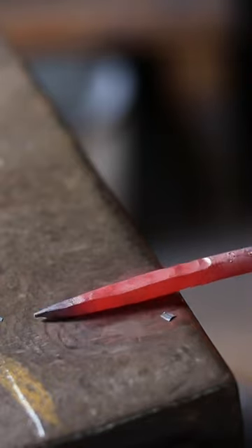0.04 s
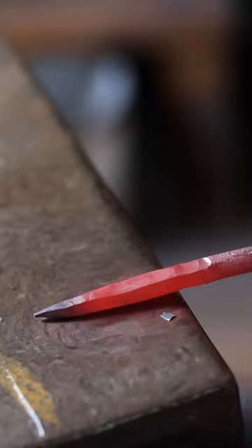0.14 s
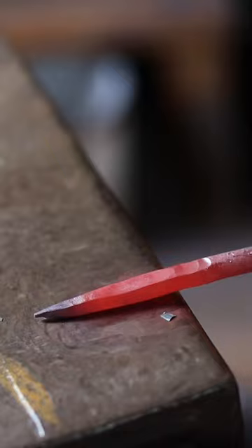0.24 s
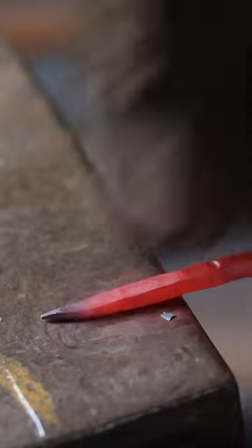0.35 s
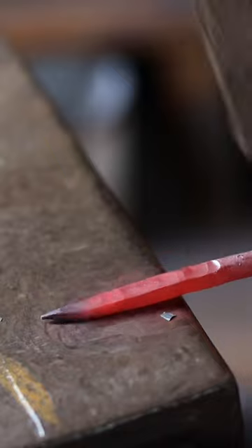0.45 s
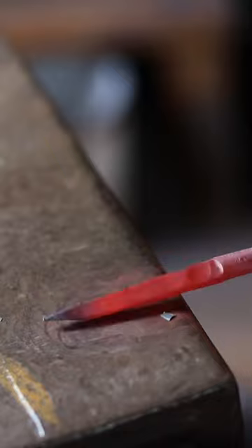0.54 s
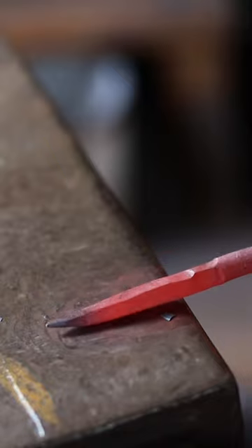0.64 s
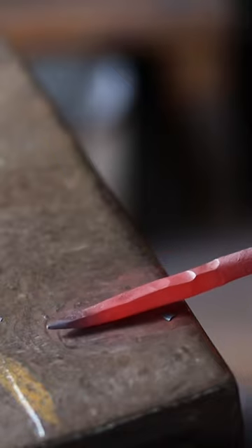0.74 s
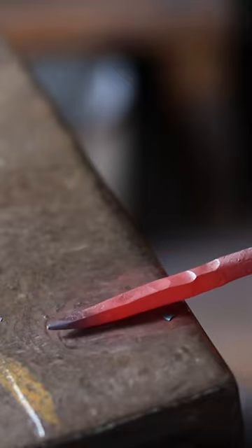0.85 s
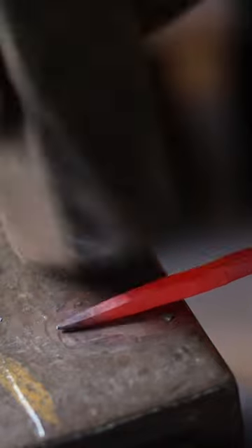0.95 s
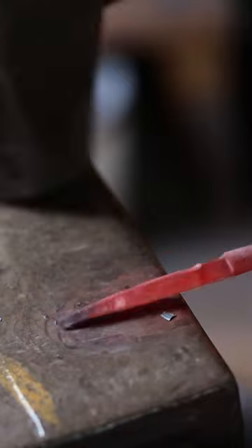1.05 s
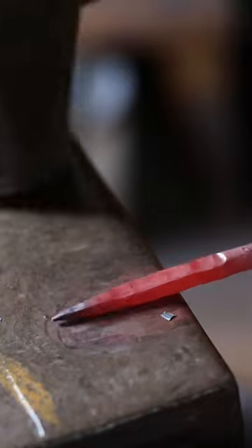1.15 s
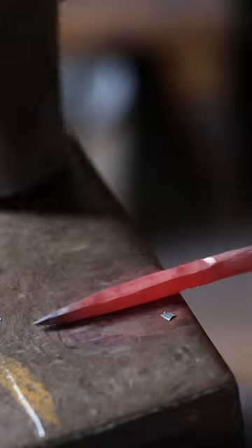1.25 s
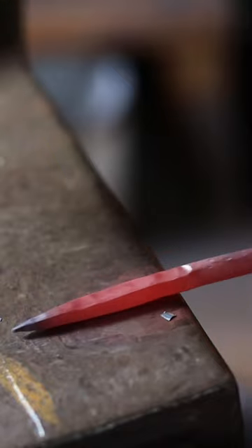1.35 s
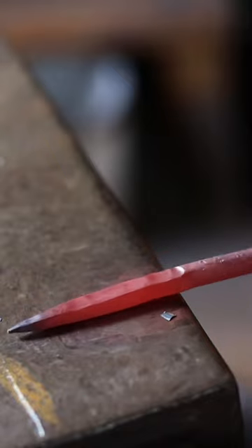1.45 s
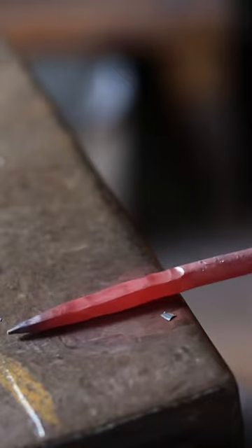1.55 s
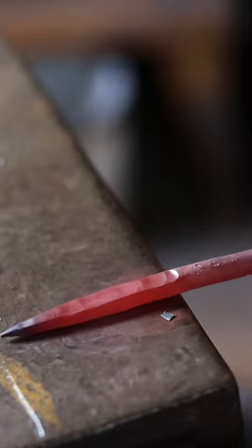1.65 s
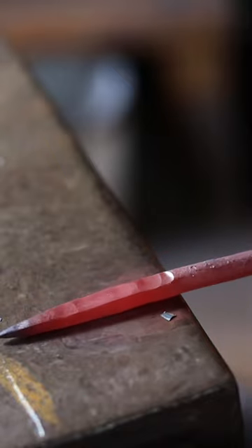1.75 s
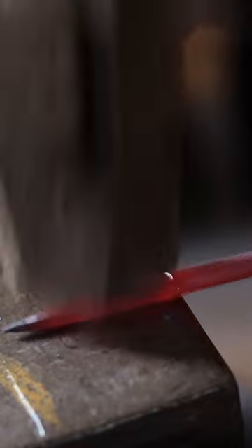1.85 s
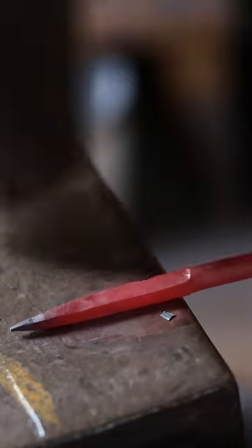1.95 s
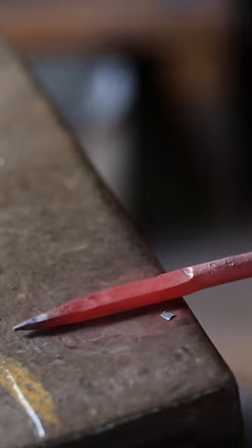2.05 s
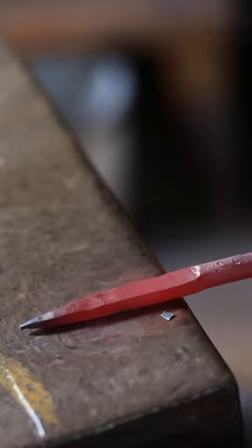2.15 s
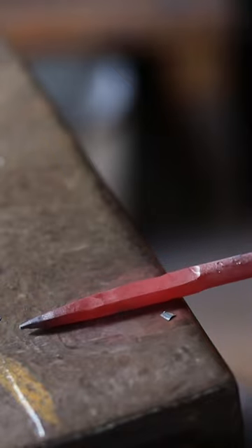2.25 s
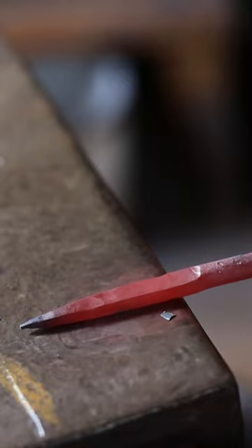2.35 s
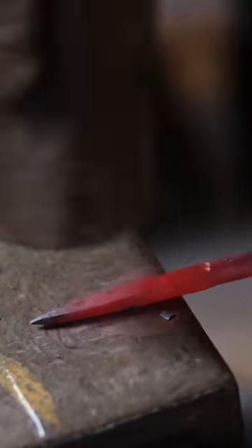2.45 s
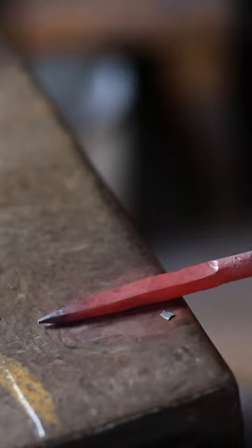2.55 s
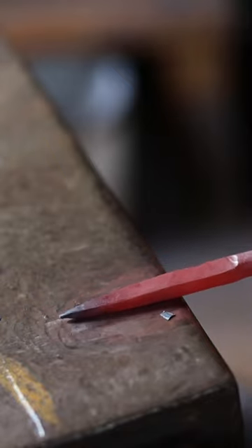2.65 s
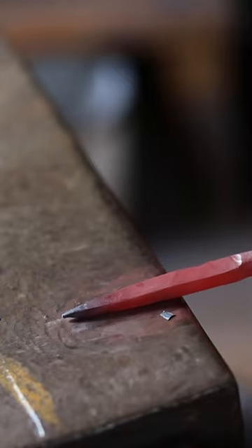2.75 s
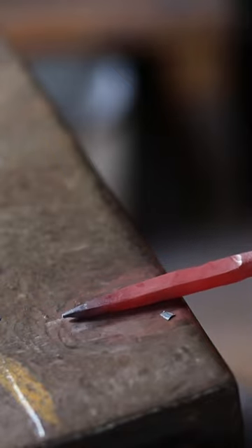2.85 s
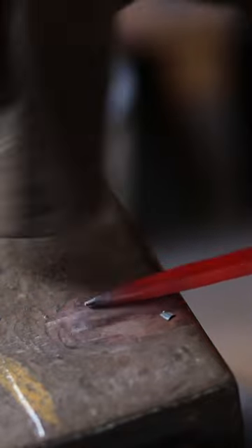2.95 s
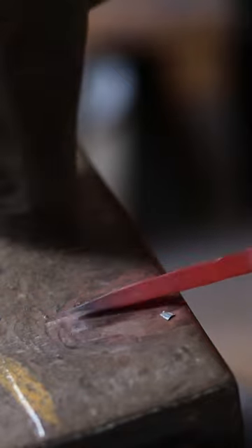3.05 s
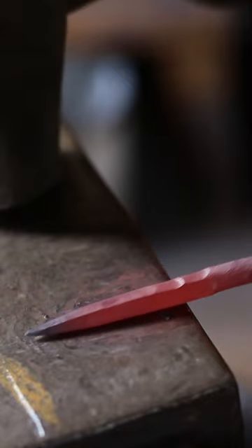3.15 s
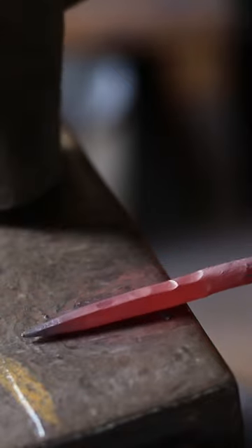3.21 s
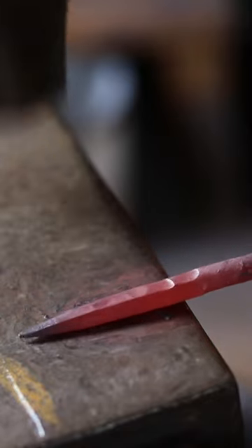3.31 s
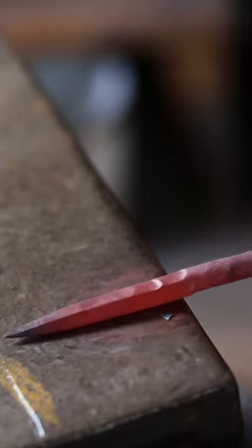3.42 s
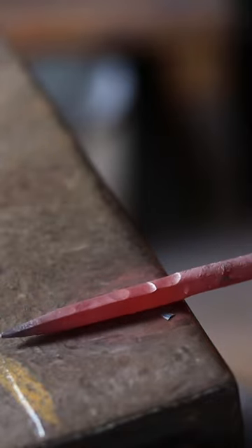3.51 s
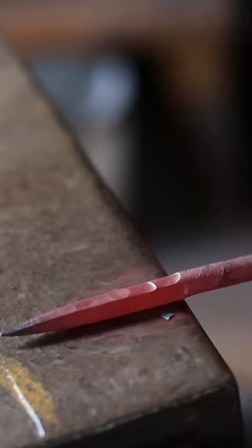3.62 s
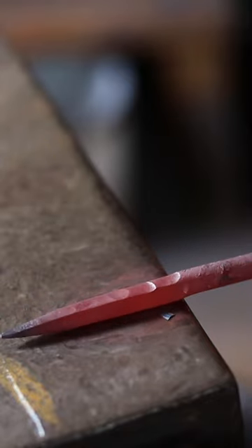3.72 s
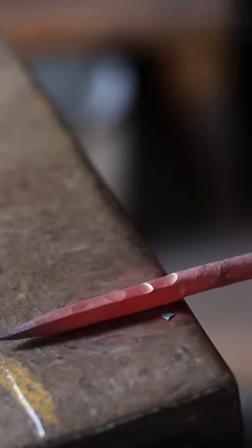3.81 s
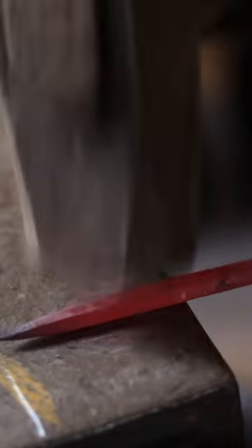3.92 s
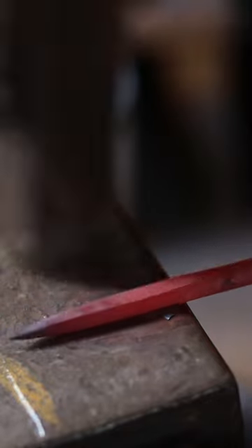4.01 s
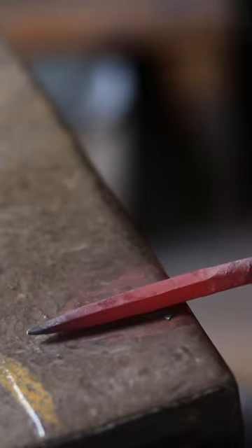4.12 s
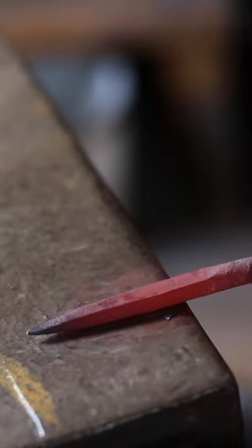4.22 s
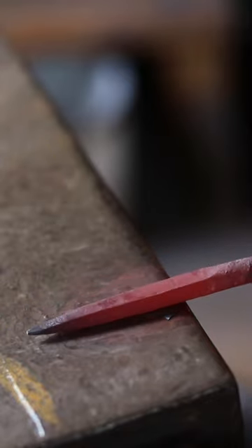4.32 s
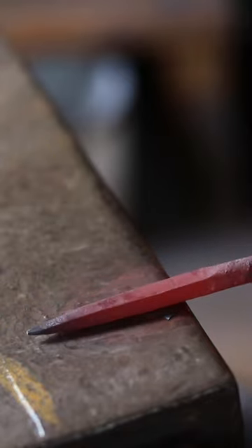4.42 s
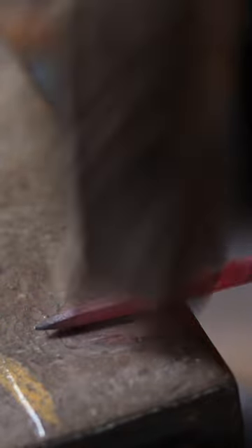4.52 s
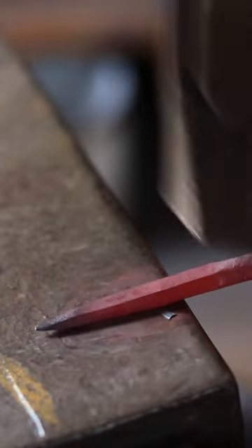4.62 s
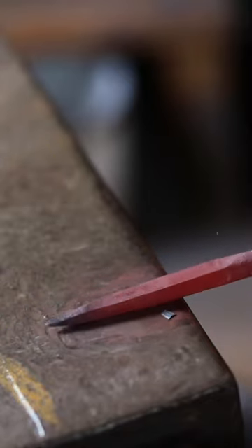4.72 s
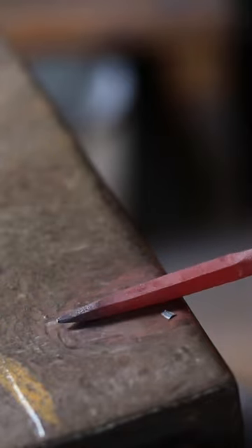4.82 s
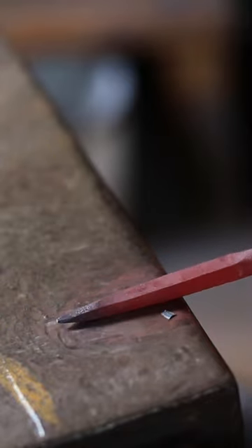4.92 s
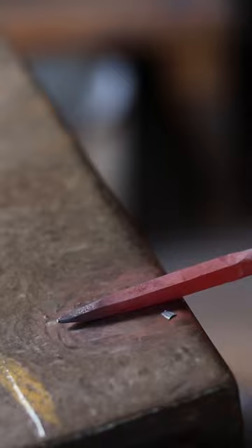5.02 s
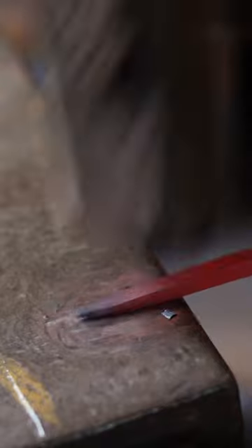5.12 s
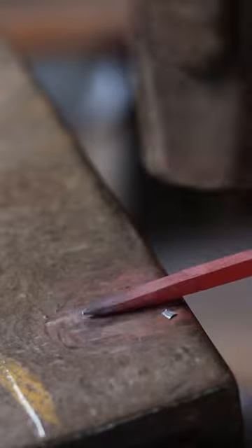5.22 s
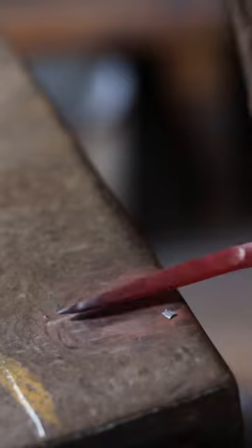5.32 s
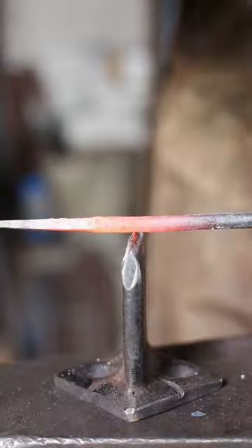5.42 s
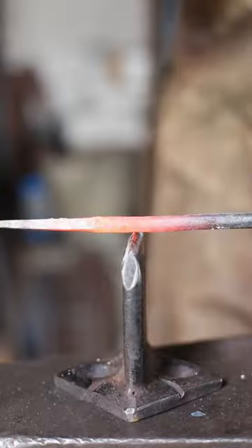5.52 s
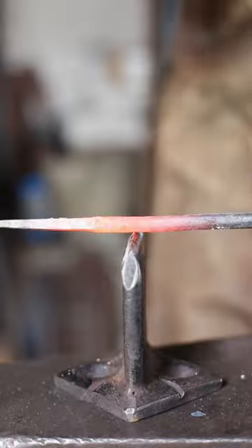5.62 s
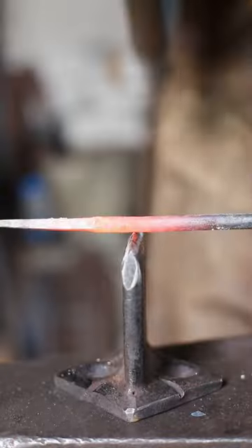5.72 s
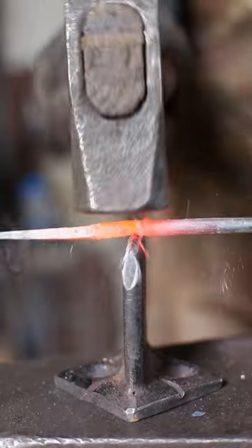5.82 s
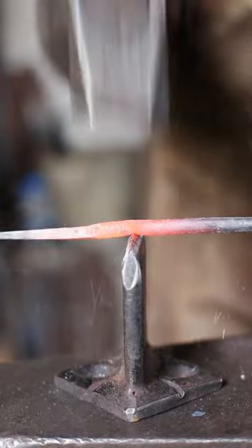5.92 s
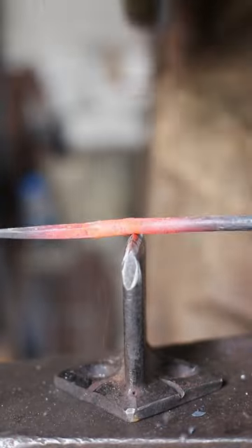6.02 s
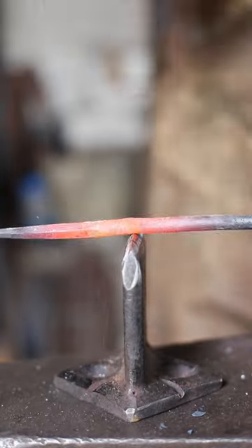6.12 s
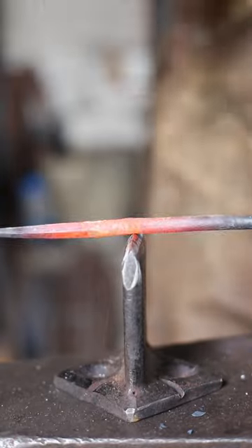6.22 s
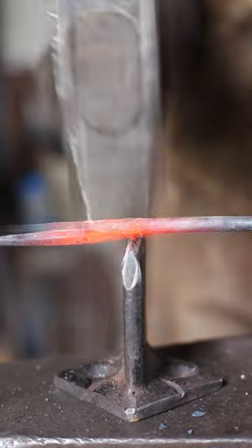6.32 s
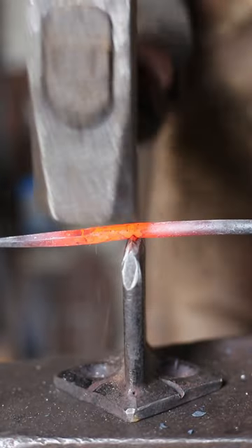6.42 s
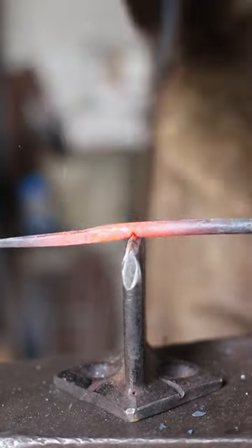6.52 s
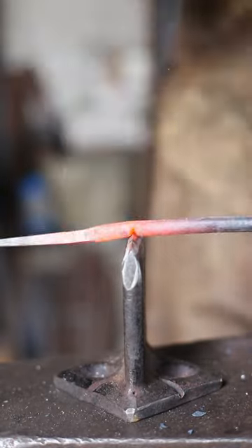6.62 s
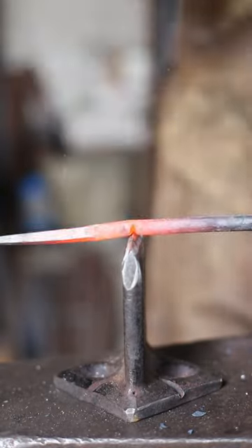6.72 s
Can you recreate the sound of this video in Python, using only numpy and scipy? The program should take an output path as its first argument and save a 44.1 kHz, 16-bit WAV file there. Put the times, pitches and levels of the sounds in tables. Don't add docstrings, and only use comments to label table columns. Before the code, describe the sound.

Steady low burner roar in a small workshop, microphone right by the anvil and overloading. Eight heavy, somewhat uneven hammer blows give a hard smack, a metallic clang and high hammer ring, dying in a fraction of a second. Two of them end in quick rattling bounces that choke the ring. Iron ticks and faint scraping follow, then two lower, woodier thuds on an upright cutting tool with the rod ringing along.

```python
import sys
import numpy as np
from scipy import signal
from scipy.fft import rfft, irfft, next_fast_len
from scipy.io import wavfile
from scipy.ndimage import uniform_filter1d

SR = 44100
rng = np.random.default_rng(int(sys.argv[2]) if len(sys.argv) > 2 else 0)


def level_to_linear(level):
    exponent = np.asarray(level, float) / 20
    return 10 ** exponent


def wrap_up_sound(samples):
    columns = np.atleast_2d(samples).T
    tamed = np.clip(columns, -1, 1)
    steps = np.round(tamed * 32767).astype(np.int16)
    wavfile.write(sys.argv[1], SR, steps)


N = 298116

# frequency in Hz, density in dB per Hz.
BURNER = [(15, -42), (25, 2), (53, -11.5), (80, -49.5), (99, -9), (270, -4), (335, -8), (373, -2.5),
          (427, -21), (503, -8.5), (641, -11), (1650, -16), (2480, -25), (2990, -24.5), (16000, -50)]
BURNER_DB = -34
# frequency in Hz, width in Hz, level in dB, start in seconds.
FLUE = [(366.5, 16, -42, -3), (188, 22, -42.5, -3), (583.4, 4.7, -42, 5.77), (473, 15, -46, 5.5)]
HISS_DB = -56.5

# start in seconds, force in dB, then anvil low mode, anvil twin mode
# and hammer ring, all in dB.
BLOWS = [(.289, 11.5, -2.5, -2, 5), (.907, 13.5, -2, 1, 8), (1.816, 13, 4.5, 4.5, 7.5),
         (2.38, 12.5, 3.5, 7.5, 11), (2.879, 12, 4, 3, 8.5), (3.891, 14, 8.5, 6.5, 5.5),
         (4.482, 13, 3, 1, 9.5), (5.088, 13, 4, -0.5, 8), (5.765, 3, -4, -8, -8),
         (6.322, 3, -8.5, -6.5, -16)]
# start in seconds, force in dB.
BOUNCES = [(1.013, 1.5), (1.039, 0.5), (1.057, -5), (1.078, -7.5), (1.086, -11), (2.985, 4.5), (3.06, -1),
           (3.111, 1), (3.142, -10.5), (3.162, -16), (3.181, -18.5)]
RESTS_S = [1.086, 3.181]
# loss at the first bounce in dB, loss at each further bounce in dB.
BOUNCE_LOSS = [(-10.5, -2.5), (-8, -4.5), (-4, -4), (-9, -10)]
REST_LOSS_DB = [0.1, 7, -28, -2]
THUD_DB, CUTTER_THUD_DB = -8, -2
CUTTER_FROM_S, BOUNCE_GAP_S = 5.5, .2

OFF_CENTRE_HZ = {"face": 14290, "cheek": 13095, "neck": 12600, "eye": 10340, "peen": 7285, "wedge": 4265}
OFF_CENTRE_T60 = {"face": .26, "cheek": .16, "neck": .094, "eye": .14, "peen": .17, "wedge": .19}
# start in seconds, part of the head, level in dB.
GLANCES = [(.288, "face", -2), (0.906, "eye", -10), (1.014, "cheek", -8), (1.057, "peen", -2),
           (1.078, "face", -22), (2.986, "peen", -7), (2.984, "wedge", -5), (2.986, "neck", -7.5),
           (3.162, "face", -40), (5.088, "eye", 1), (5.089, "cheek", -4), (5.37, "face", -55),
           (5.41, "peen", -47)]
PRESSED_RING = .4
ROD_HZ = [
    [7364, 11000, 3270],
    [996, 7935, 3430, 11500, 6905, 10750, 5750],
]
# level in dB re force, t60 in seconds.
ROD = [
    [(-0.5, 0.28), (-2, 0.14), (-11, 0.23)],
    [(-3, 0.25), (0, 0.13), (3, 0.071), (-5.5, .078), (-9.5, 0.24), (-22.5, .21), (-3, 0.12)],
]
ROD_SWELL_CYCLES = 8.6

ANVIL_LOW_HZ = [2405, 2405]
# level in dB re the low column, t60 in seconds.
ANVIL_LOW = [(-5, 0.56), (2.5, 0.26)]
ANVIL_TWIN_HZ = [2541, 1830, 5740]
# level in dB re the twin column, t60 in seconds.
ANVIL_TWIN = [(5, 0.26), (-22, 0.19), (-18.5, 0.28)]
PARTNER_HZ = [-8, 10]
# level in dB re the column, t60 in seconds, first swell in seconds.
PARTNER = [(-6, .4, .075), (-9, 0.45, 0.024)]
ANVIL_HORN_HZ = [2060, 4242, 5197, 6046, 6645, 52, 9060, 11250, 3230]
# level in dB re the blow's tail, t60 in seconds.
ANVIL_HORN = [(-20.5, 0.27), (-21.5, 0.34), (-28.5, .3), (-13.5, 0.22), (-25.5, 0.4), (-29, 0.76),
              (-26, .17), (-26.5, .16), (-28, 0.11)]
SEAT_DB = -2.5
HAMMER_HZ = [7612, 7222, 10340, 12600, 13120, 13585]
# level in dB re the hammer column, t60 in seconds.
HAMMER = [(2.5, 0.23), (-3, 0.18), (-16.5, 0.16), (-15, 0.047), (-25, .15), (-33, 0.28)]
LOOSE_UNTIL_S, LOOSE_PITCH, LOOSE_RING = 1.5, .9965, 1.47
BEAT = .3
CUTTER_HZ = [212, 247, 280, 441, 640, 583, 783, 4900, 6050, 7364, 8608, 700, 856]
# delay in seconds, level in dB re thud, t60 in seconds, rise in ms.
CUTTER = [(0.00074, -1.5, 0.12, 3), (.021, 3, 0.19, 40), (.021, -4.5, 0.29, 23), (0.0012, -12, 0.39, 3.9),
          (0.00073, -9, 0.18, 2.3), (.05, -9.5, 0.17, 14), (0.00678, -16.5, 0.43, 12),
          (0.0094, -17, 0.19, 1.5), (0.0064, -8.5, 0.19, 5.6), (0.0085, -7, 0.11, 3.2),
          (0.00029, -4.5, 0.12, 1.2), (.01, -13.5, 0.28, 8), (.01, -15.5, 0.27, 8)]

# frequency in Hz, density in dB per Hz, t60 in seconds, rise in ms.
TAIL = [(30.1, -27, 0.64, 37), (51, -15, 0.3, 19), (102, -16.5, 0.79, 13), (278, 0, 0.48, 2.2),
        (504, -3, 0.49, 2.2), (1296, -19.5, 0.45, 15), (2050, -15.5, 0.44, 0.8), (4060, -19.5, .3, 0.61),
        (7900, -22, 0.26, 0.46), (14600, -26, 0.16, 2.6)]
THUD_HZ = 736
CRACK_DB, CRACK_T60 = 12.5, 0.009
BOUNCE_DB, BOUNCE_T60 = 5, 0.35
BOUNCE_DULL_DB = -10
SOFT_DULL_DB = -0.32
CLICK_DB, CLICK_T60 = 9, 0.0073
GRAIN_DB, GRAIN_HZ = 2.5, 40

# start in seconds, level in dB, frequency in Hz, t60 in seconds.
TICKS = [(1.582, -17, 1270, 0.018), (1.581, -9.5, 2040, 0.012), (1.763, -30, 5500, 0.005),
         (1.789, -27, 6500, 0.004), (1.1, -40, 10000, 0.004)]
# start in seconds, length in seconds, level in dB.
SCRAPES = [
    (1.1, .24, -46.5),
    (5.35, .2, -49),
]

CLIP, EDGE_HZ = 0.71, 15900
# time in seconds, lower limit in Hz.
THINNED = [(.406, 2000), (.766, 4500), (2.046, 3500), (2.403, 1500), (2.862, 3500), (3.03, 3500),
           (3.37, 3500), (3.773, 5000), (4.136, 3500), (4.522, 1500), (4.629, 3500), (4.969, 5000),
           (5.013, 5000), (5.332, 3000), (5.373, 3500), (5.695, 3500), (6.336, 1200), (6.696, 4500)]


def evened(x):
    return x / np.sqrt(np.mean(x ** 2) + 1e-20)


def add(mix, s, sound):
    part = mix[round(s * SR):][:len(sound)]
    part += sound[:len(part)]


def ring(hz, db, t60, phase, length=.9, rise_ms=0.72):
    length = min(length, t60)
    t = np.arange(round(length * SR)) / SR
    stop = np.clip((length - t) / .002, 0, 1)
    throb_hz = 9 + 25 * (7 * phase % 1)
    throb = 1 + BEAT * (hz > 3000) * np.cos(2 * np.pi * (throb_hz * t + 3 * phase))
    swell = 1 - np.exp(-1000 * t / rise_ms)
    return throb * level_to_linear(db - 60 * t / t60) * swell * stop * np.sin(2 * np.pi * (hz * t + phase))


def burner():
    frames, hz = N // 256 + 5, np.fft.rfftfreq(2048, 1 / SR)
    a, b, patches = rng.standard_normal((frames, 1025, 3)).T
    patches = uniform_filter1d(patches, size=16, axis=0)
    patches = evened(uniform_filter1d(patches, size=14, axis=1))
    flutter = .7 * evened(uniform_filter1d(rng.standard_normal(frames), size=10))
    f, db = np.transpose(BURNER)
    colour_db = np.interp(np.log(hz + 1), np.log(f + 1), db)[:, None]
    z = (a + 1j * b) * level_to_linear(colour_db + 1.6 * patches + flutter)
    roar = evened(signal.istft(z, nperseg=2048, noverlap=1792)[1][:N])
    return level_to_linear(BURNER_DB) * roar


def flue():
    out = np.zeros(N)
    for hz, width, db, start in FLUE:
        resonance = signal.iirpeak(hz, hz / width, SR)
        whistle = evened(signal.lfilter(*resonance, rng.standard_normal(N)))
        out += level_to_linear(db) * whistle * (np.arange(N) / SR >= start)
    return out


def off_centre_head():
    out, late = np.zeros(N), np.array(RESTS_S)
    for s, part, db in GLANCES:
        pressed = np.any((late - s > 0) & (late - s < .025))
        t60 = OFF_CENTRE_T60[part] * (PRESSED_RING if pressed else 1)
        add(out, s, ring(OFF_CENTRE_HZ[part], db, t60, rng.random()))
    return out


def contacts():
    rows, (first_db, further_db) = [], np.transpose(BOUNCE_LOSS)
    for s, force_db, *rings_db in BLOWS:
        thud_db = force_db + (THUD_DB if s < CUTTER_FROM_S else CUTTER_THUD_DB)
        blow_db = np.array([thud_db, *rings_db])
        rows.append((s, force_db, *blow_db))
        after = [row for row in BOUNCES if s < row[0] < s + .5]
        for k, (at, db) in enumerate(after):
            resting = k == len(after) - 1
            loss_db = first_db + k * further_db + resting * np.array(REST_LOSS_DB)
            rows.append((at, db, *(blow_db + loss_db)))
    return rows


def struck_modes(contact, dull_db):
    s, tail_db, _, low_db, twin_db, head_db = contact
    pitch, longer = (LOOSE_PITCH, LOOSE_RING) if s < LOOSE_UNTIL_S else (1, 1)
    horn_db = tail_db + dull_db + SEAT_DB * (s > CUTTER_FROM_S)
    modes = [(hz, db + low_db, t60) for hz, (db, t60) in zip(ANVIL_LOW_HZ, ANVIL_LOW)]
    modes += [(hz, db + twin_db, t60) for hz, (db, t60) in zip(ANVIL_TWIN_HZ, ANVIL_TWIN)]
    modes += [(hz, db + horn_db, t60) for hz, (db, t60) in zip(ANVIL_HORN_HZ, ANVIL_HORN)]
    for hz, (db, t60) in zip(HAMMER_HZ, HAMMER):
        modes.append((hz * pitch, db + head_db + dull_db * (hz > 9515), t60 * longer))
    return modes


def steel():
    rows = contacts()
    out, luck = np.zeros(N), rng.random((len(rows), 40))
    luck[:, 1] = luck[:, 0]
    ends = [row[0] for row in rows[1:]] + [N / SR]
    starts = [-1] + [row[0] for row in rows]
    for row, before, end, phases in zip(rows, starts, ends, luck):
        s, tail_db, thud_db, low_db, twin_db, _ = row
        dull_db = BOUNCE_DULL_DB * (s - before < BOUNCE_GAP_S)
        for (hz, db, t60), phase in zip(struck_modes(row, dull_db), phases):
            add(out, s, ring(hz, db, t60, phase, length=end - s))
        pair_hz = ANVIL_LOW_HZ[0], ANVIL_TWIN_HZ[0]
        pairs = zip(pair_hz, (low_db, twin_db), phases[1:], PARTNER_HZ, PARTNER)
        for hz, column_db, phase, off_hz, (db, t60, swell_s) in pairs:
            add(out, s, ring(hz + off_hz, column_db + db, t60, phase - off_hz * swell_s, length=end - s))
        if min(abs(s - np.array(RESTS_S))) < .004:
            continue
        if s < CUTTER_FROM_S:
            add(out, s, ring(1805, tail_db + 9.5, 0.013, 0, rise_ms=.1))
        else:
            for hz, (delay, db, t60, rise_ms) in zip(CUTTER_HZ, CUTTER):
                add(out, s + delay, ring(hz, thud_db + db + 7, t60, 0, rise_ms=rise_ms))
    return out


def walls(x):
    at = np.arange(100, SR // 2, 24)
    taps = np.zeros(SR // 2 + 24)
    fade = level_to_linear(-60 * at / SR / .3)
    taps[at + rng.integers(0, 24, len(at))] = rng.choice([-1., 1.], len(at)) * fade
    return signal.fftconvolve(x, taps / np.linalg.norm(taps))[:N]


def shop():
    size = next_fast_len(N)
    hz, noise = np.fft.rfftfreq(size, 1 / SR), rfft(rng.standard_normal(size))
    centres = np.geomspace(30, 18000, 16)
    place = np.interp(np.log(hz + 1), np.log(centres), np.arange(len(centres)))
    f, colour_db, t60s, rises_ms = np.transpose(TAIL)
    colour = level_to_linear(np.interp(np.log(hz + 1), np.log(f), colour_db))
    thicket = evened(uniform_filter1d(rng.standard_normal(len(hz)), size=round(GRAIN_HZ * size / SR)))
    colour *= level_to_linear(GRAIN_DB * thicket * (hz > 2700))
    noise *= colour / np.sqrt(np.mean(colour ** 2))

    s, tail_db, thud_db, *_ = np.transpose([np.full(6, -99.)] + contacts())
    step = 8
    t = np.arange(0, N + step, step) / SR
    last = np.searchsorted(s, t) - 1
    resting = (abs(s[:, None] - RESTS_S).min(axis=1) < .004)[last]
    age, out = t - s[last], np.zeros(N)
    bounce = (np.diff(s, prepend=0) < BOUNCE_GAP_S)[last] & (last > 0)
    flight = np.diff(s, prepend=s[0] - 1)[last]
    bounce_db = BOUNCE_DB - 60 * age / (BOUNCE_T60 * flight)
    crack_db = np.where(bounce, bounce_db, CRACK_DB - 60 * age / CRACK_T60)
    click = bounce * level_to_linear(tail_db[last] + CLICK_DB - 60 * age / CLICK_T60) ** 2
    burst = ~resting * (level_to_linear(tail_db[last] + crack_db) ** 2 + click)
    softness_db = np.maximum(-tail_db[last], 0)

    for k, centre in enumerate(centres):
        t60, rise_ms = (np.interp(np.log(centre), np.log(f), c) for c in (t60s, rises_ms))
        low = 1 / (1 + (centre / THUD_HZ) ** 4)
        octaves = max(np.log2(centre / 3000), 0)
        level_db = (low * thud_db + (1 - low) * tail_db)[last]
        power = level_to_linear(level_db - 60 * age / t60) ** 2
        power *= level_to_linear(bounce * BOUNCE_DULL_DB * octaves) ** 2
        power += (1 - low) * burst * level_to_linear(SOFT_DULL_DB * softness_db * octaves) ** 2
        lag = np.exp(-1000 * step / rise_ms / SR)
        swell = np.sqrt(signal.lfilter([1 - lag], [1, -lag], power))
        share = np.cos(np.pi / 2 * np.clip(place - k, -1, 1)) ** 2
        out += np.repeat(swell, step)[:N] * irfft(noise * share, size)[:N]
    return out


def scrapes():
    out = np.zeros(N)
    high = signal.butter(2, 6000, "high", fs=SR)
    for s, length, db in SCRAPES:
        grains = rng.standard_normal(SR // 2) * level_to_linear(4.0 * rng.standard_normal(SR // 2))
        hiss = evened(signal.lfilter(*high, grains))[:round(length * SR)]
        add(out, s, level_to_linear(db) * hiss * np.hanning(len(hiss)))
    return out


def ticks():
    out, t = np.zeros(N), np.arange(3000) / SR
    for s, db, hz, t60 in TICKS:
        band = signal.butter(2, [.5 * hz, 1.5 * hz], "band", fs=SR)
        puff = signal.lfilter(*band, rng.standard_normal(len(t)))
        add(out, s, ring(hz, db, t60, 0, length=.06, rise_ms=0.13))
        add(out, s, level_to_linear(db - 12.5 - 60 * t / (10.0 * t60)) * puff)
    return out


def rod_overhang():
    out = np.zeros(N)
    cuts = [row for row in BLOWS if row[0] > CUTTER_FROM_S]
    for (s, force_db, *_), pitches, rod in zip(cuts, ROD_HZ, ROD):
        for hz, (db, t60) in zip(pitches, rod):
            rise_ms = 1000 * ROD_SWELL_CYCLES / hz
            add(out, s, ring(hz, force_db + db, t60, rng.random(), rise_ms=rise_ms))
    return out


def scene():
    rings = steel() + off_centre_head() + rod_overhang()
    mono = burner() + flue() + rings + level_to_linear(-14.5) * walls(rings) + shop() + scrapes() + ticks()
    mono += level_to_linear(HISS_DB) * rng.standard_normal(N)
    return np.array([mono, mono])


def thin_treble(x):
    hz, t, z = signal.stft(x, SR, nperseg=512, noverlap=384)
    for s, above_hz in THINNED:
        frames = abs(t - s) < .008
        level = abs(z[:, frames]).mean(axis=1)
        peak = level > 1.9 * uniform_filter1d(level, size=15)
        z[np.ix_((hz > above_hz) & ~peak, frames)] *= level_to_linear(-12)
    return signal.istft(z, SR, nperseg=512, noverlap=384)[1][:N]


def roll_off(x):
    return signal.sosfilt(signal.butter(12, 16380, fs=SR, output="sos"), x)


def record(dry):
    clipped = thin_treble(np.clip(dry[0], -CLIP, CLIP))
    lowpass = signal.firwin(255, EDGE_HZ, window=("kaiser", 7), fs=SR)
    limited = signal.oaconvolve(clipped, lowpass, "same")
    return roll_off(np.array([limited, limited]))


dry = scene()
out = record(dry)
wrap_up_sound(out)
```